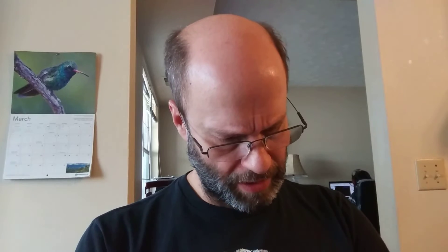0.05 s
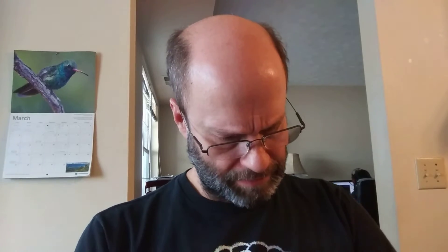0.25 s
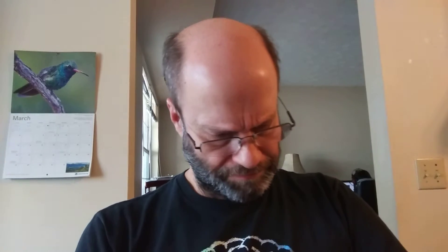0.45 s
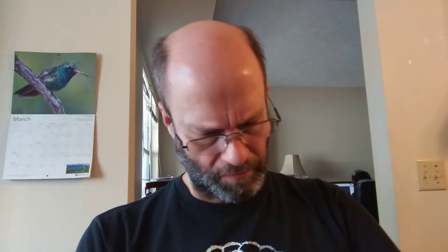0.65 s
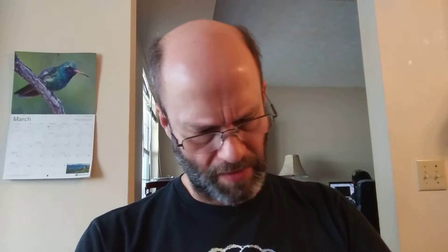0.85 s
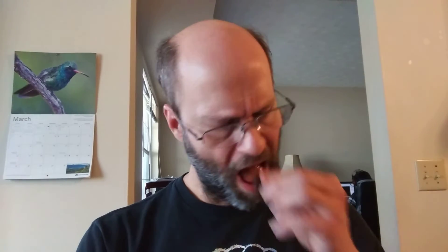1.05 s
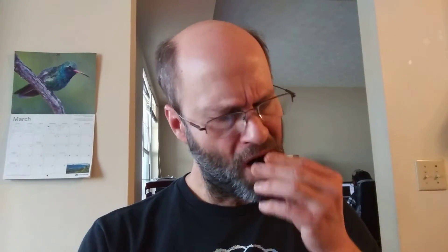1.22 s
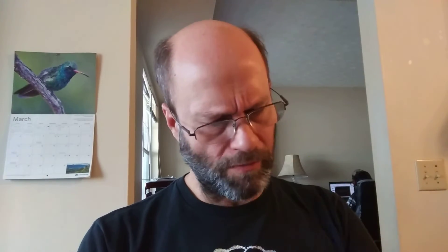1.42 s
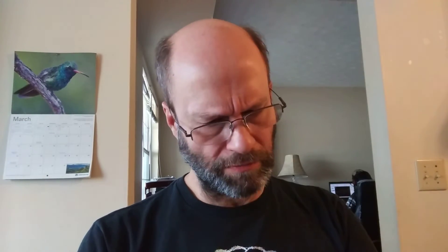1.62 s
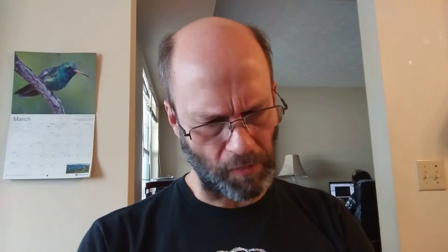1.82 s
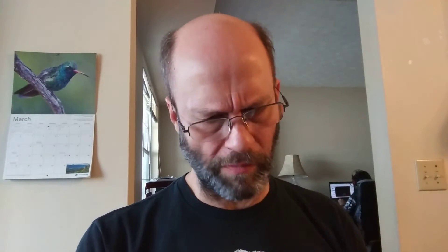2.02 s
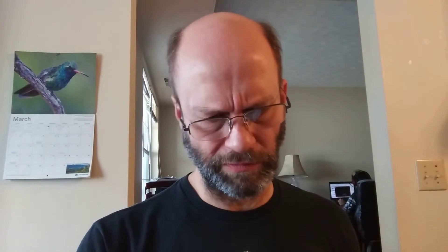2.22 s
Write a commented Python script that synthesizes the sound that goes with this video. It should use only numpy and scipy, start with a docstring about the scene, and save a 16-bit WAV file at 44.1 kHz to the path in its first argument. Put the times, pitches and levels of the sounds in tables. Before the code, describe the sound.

A chocolate bar breaks with one sharp snap close to the microphone. Faint clicks, soft bumps and brief rustles follow as it is handled in a small, quiet room.

```python
"""A bar of dark chocolate snaps close by in a small, quiet room.
Brittle fracture releases a noise burst and sets the bar briefly ringing in its damped modes.
The walls return early reflections, then reverberation and the room's modes die away.
Faint ticks, soft bumps and short rustles of handling surround the snap,
over room tone, a faint hiss and a thin electrical whine."""
import sys
import numpy as np
from scipy import signal
from scipy.fft import rfft, irfft, next_fast_len
from scipy.io import wavfile
from scipy.ndimage import uniform_filter1d

SR = 44100
rng = np.random.default_rng(int(sys.argv[2]) if len(sys.argv) > 2 else 0)


def unload_wav(signal):
    """Save mono or channel-first audio to the path in sys.argv[1] as 16-bit WAV at rate SR, clipped to [-1, 1]."""
    wavfile.write(
        sys.argv[1],
        SR,
        np.round(np.clip(np.atleast_2d(signal).T, -1, 1) * 32767).astype(np.int16),
    )


N = 100107

# the fracture starts, then runs through the bar: start_s, level_db, t60_s
FRACTURES = [(0.4053, -10.5, .004), (.4061, -8.5, 0.02)]
# spectrum of the fracture: frequency_hz, relative_density_db
FRACTURE_SPECTRUM = [(30, -21.5), (120, -18), (300, -3.5), (1100, 2.5), (2200, -6.5), (3200, 0),
                     (4500, -5.5), (5400, -12), (6500, -8), (8200, -4.5), (13000, -6), (16000, -18.5)]
# modes of the broken bar: pitch_hz, level_db, t60_s
BAR_MODES = [(401.3, -19.5, 0.037), (1092, -16, 0.013), (2182, -13.5, .018), (3950, -9.5, .014),
             (4542, -4.5, 0.01), (6466, -16, 0.024)]
# early reflections of the crack: delay_s, gain_db
WALL_REFLECTIONS = [(.0087, -7.5), (.0112, -6.5), (.0128, -5.5), (.0142, -8.5), (.0222, -13), (.0335, -10)]
# the snap as it fills the room: frequency_hz, relative_density_db
REVERB_SPECTRUM = [(24, -79.5), (40, -49.5), (176, -30.5), (209, -10.5), (237, 0.5), (283, -7.5), (320, 0),
                   (363, -11), (455, -7), (697, -4), (770, -6.5), (990, -2), (1150, -9), (1850, -4),
                   (2500, -13.5), (4340, -1), (5720, -9), (6820, -2.5), (7930, -10.5), (13100, -13.5),
                   (16000, -20.5)]
# reverberation time of the room: frequency_hz, t60_s
REVERB_TIMES = [(60, 0.27), (250, .24), (1000, .28), (4000, 0.28), (8000, 0.25), (15000, 0.26)]
# the room's strongest modes: pitch_hz, level_db
STANDING_WAVES = [(226, -28.5), (256, -33), (327, -28.5), (964, -32), (1416, -33), (1792, -31.5),
                  (1966, -33.5), (2573, -35), (3693, -31), (3930, -31), (4516, -26.5), (4637, -31),
                  (4758, -28.5), (4958, -32), (6185, -35.5), (6934, -31.5)]
# small dry clicks: start_s, level_db, pitch_hz, relative_noise_db, relative_treble_db, rise_s, t60_s
TICK_EVENTS = [(.052, -50.5, 2420, 2, -14.5, 0.0011, 0.011), (.070, -48.5, 3340, -5.5, -10, 0.00075, 0.011),
               (0.079, -54.5, 8500, -9, 1.5, 0.0016, .02), (0.102, -39, 1943, -11.5, -20, 0.0031, 0.013),
               (.2348, -37, 3900, 2, -11, .0004, 0.01), (.584, -46, 1450, 4.5, -15, 0.00063, 0.021),
               (.662, -55, 4600, -4.5, -0.5, 0.00057, 0.016), (.892, -56, 2140, -2, -13.5, 0.00068, 0.022),
               (.933, -56, 11000, -13, 0, .0015, 0.018), (.992, -46.5, 2000, -0.5, -6.5, 0.0017, 0.02),
               (1.007, -44, 2137, 0.5, -4.5, 0.0032, 0.016),
               (1.0169, -41.5, 2100, -7.5, -1.5, 0.00073, 0.013),
               (1.076, -54.5, 8440, -6, -3.5, .001, 0.017), (1.079, -46, 3725, -15.5, -15.5, 0.0012, 0.014),
               (1.180, -63, 5400, -6, 3, .001, .015), (1.322, -58, 6540, -7.5, -5, 0.00096, .012),
               (1.378, -58, 9170, -9.5, -4, .001, .012), (1.419, -53, 2105, 0.5, -18, 0.00096, 0.011),
               (1.478, -52, 2905, 0, -24.5, 0.00089, 0.031), (1.546, -42.5, 2080, 2, -19, 0.00061, 0.03),
               (1.555, -54, 3110, -0.5, -18, 0.0044, 0.047), (1.6781, -36, 2290, 2, 6, 0.00056, 0.00797),
               (1.686, -41, 9900, 1, -3.5, 0.00053, .008), (1.6883, -39.5, 2770, 4, 1, 0.00041, .018),
               (1.768, -46.5, 2550, -14, -9.5, .001, 0.034), (1.894, -43.5, 10140, -4, -2, 0.0012, 0.018),
               (1.899, -41, 3760, -8, -7, 0.0015, 0.017), (1.900, -41, 2558, -7, -10, 0.0026, .022)]
# noise in the body of a click: frequency_hz, relative_density_db
TICK_BODY_SPECTRUM = [(60, -30), (250, -14), (1000, -4.5), (2500, 6), (4300, 0.5), (5500, -11.5),
                      (9000, -14.5), (16000, -27.5)]
# noise in its treble: frequency_hz, relative_density_db
TICK_TREBLE_SPECTRUM = [(2000, -26), (5500, -3), (9500, -2.5), (12000, -7), (16000, -6)]
# soft, dull contacts: start_s, level_db, pitch_hz, t60_s
BUMP_EVENTS = [(0.175, -50, 399, 0.016), (.573, -44.5, 168, 0.036), (.578, -41.5, 405, 0.032),
               (.823, -40, 303, 0.042), (1.478, -39.5, 340, 0.023), (1.547, -38.5, 293.5, 0.034),
               (1.686, -40, 370, 0.031), (1.689, -41.5, 900, 0.022), (1.765, -50, 313, 0.077)]
# brushes of fingers and wrapper: peak_s, level_db, rise_s, fall_s, treble_tilt_db_per_octave
BRUSHES = [(.142, -54, 0.067, 0.053, 0), (.402, -53.5, 0.0451, 0.01, -0.5), (0.808, -43, 0.051, 0.032, -1),
           (1.621, -49.5, 0.0038, 0.022, -2), (1.634, -54.5, 0.013, 0.0074, 0.5),
           (1.659, -52.5, .003, .03, 1), (1.676, -44, 0.021, 0.042, 0), (1.769, -55, 0.041, 0.046, -4),
           (1.899, -53.5, 0.016, 0.0098, -4.5), (2.262, -63, 0.047, .04, -8)]
# friction noise of a brush: frequency_hz, relative_density_db
FRICTION_SPECTRUM = [(120, -44.5), (200, -16.5), (448, -9.5), (836, -13), (2960, -10.5), (4200, -6.5),
                     (4520, -5), (5940, -15), (10300, -13.5), (11700, -16.5), (16000, -15.5)]
# room tone: frequency_hz, relative_density_db
ROOM_TONE_SPECTRUM = [(15, -75.5), (25, -43), (141, -35), (170, -12.5), (270, -4), (317, -1), (427, -8),
                      (531, -6), (887, -13), (1070, -8.5), (1480, -18.5), (3250, -23), (7920, -35.5),
                      (9320, -28), (16000, -29)]
# slow drift of the hiss: time_s, relative_level_db
HISS_LEVELS = [(0.0, -59), (0.26, -72), (0.6, -67), (1.23, -68), (1.43, -72), (1.71, -65), (1.94, -71.5),
               (2.26, -74.5)]
# spectrum of the hiss: frequency_hz, relative_density_db
HISS_SPECTRUM = [(300, -11.5), (1500, 4), (4200, -1.5), (6000, -8), (16000, -15.5)]

ROOM_DELAY_S, ROOM_BUILD_S = 0.008, 0.0048


def snap():
    """Brittle fracture radiates noise and excites the bar's modes; the direct sound carries little deep bass."""
    start, split = FRACTURES[0][0], FRACTURES[-1][0]
    crack = sum(amp(db) * envelope(s, t60, rise_s=0.00016) * noise(FRACTURE_SPECTRUM)
                for s, db, t60 in FRACTURES)
    ring = sum(amp(db) * envelope(split, t60, rise_s=0.00051) * tone(split, hz)
               for hz, db, t60 in BAR_MODES)
    direct = crack + ring
    return low_cut(direct, hz=90, order=1) + wall_echoes(direct) + snap_reverberation(start)


def wall_echoes(direct):
    """Reflection: each wall path returns a delayed, weaker copy with little bass."""
    def response(hz):
        return sum(amp(db) * np.exp(-2j * np.pi * hz * delay) for delay, db in WALL_REFLECTIONS)
    return filtered(low_cut(direct, hz=259.4, order=2), response)


def snap_reverberation(start_s, diffuse_db=-15.5):
    """A diffuse field and standing waves decay at the room's reverberation time for each frequency."""
    diffuse = room_decay(noise(REVERB_SPECTRUM), start_s + ROOM_DELAY_S, hold_s=0.015)
    modes = sum(amp(db) * envelope(start_s, curve_at(REVERB_TIMES, hz), rise_s=0.008) * tone(start_s, hz)
                for hz, db in STANDING_WAVES)
    return amp(diffuse_db) * diffuse + modes


def ticks():
    """Impulsive excitation: one damped resonance and two bands of noise share each click's envelope."""
    body, treble = noise(TICK_BODY_SPECTRUM), noise(TICK_TREBLE_SPECTRUM)
    out = np.zeros(N)
    for start, db, hz, noise_db, treble_db, rise, t60 in TICK_EVENTS:
        click = tone(start, hz) + amp(noise_db) * body + amp(treble_db) * treble
        out += amp(db) * envelope(start, t60, rise) * click
    return out


def bumps():
    """Damped oscillation: each soft contact gives a brief low note."""
    return sum(amp(db) * envelope(s, t60, rise_s=0.0034) * tone(s, hz) for s, db, hz, t60 in BUMP_EVENTS)


def rustles(grain_db=3):
    """Sliding friction makes grainy noise; each rise or fall time spans a tenfold amplitude change."""
    out = np.zeros(N)
    for peak, db, rise, fall, tilt_db in BRUSHES:
        t = since(peak)
        swell = 10 ** -np.maximum(-t / rise, t / fall)
        flicker = unit_rms(uniform_filter1d(rng.standard_normal(N), size=40))
        friction = amp(grain_db * flicker) * noise(FRICTION_SPECTRUM, tilt_db)
        out += amp(db) * swell * unit_rms(friction)
    return out


def handling_reverberation(x, gain_db=-12):
    """Convolution with the room's impulse response gives each small sound a diffuse tail."""
    impulse_response = room_decay(rng.standard_normal(N), ROOM_DELAY_S, hold_s=0)[:SR // 2]
    impulse_response /= np.linalg.norm(impulse_response)
    return amp(gain_db) * signal.fftconvolve(x, impulse_response)[:N]


def room_decay(x, start_s, hold_s):
    """Absorption: the field builds up and, after hold_s, each frequency decays at its own rate."""
    hz, t, spectra = signal.stft(x, SR, nperseg=256)
    decay_s = np.maximum(t - start_s - hold_s, 0)
    decay = np.exp(-np.log(1000) * decay_s / curve_at(REVERB_TIMES, hz)[:, None])
    build_up = np.clip(since(start_s) / ROOM_BUILD_S, 0, 1)
    return signal.istft(spectra * decay, SR, nperseg=256)[1][:N] * build_up


def background(room_tone_db=-63, hiss_gain_db=-1.5, whine_db=-80, whine_hz=9591.5):
    """The noise floor is the sum of steady room tone, a drifting hiss and a thin electrical whine."""
    room_tone = amp(room_tone_db) * noise(ROOM_TONE_SPECTRUM)
    drift_db = np.interp(since(0), *np.transpose(HISS_LEVELS))
    hiss = amp(hiss_gain_db + drift_db) * noise(HISS_SPECTRUM)
    whine = amp(whine_db) * np.sqrt(2) * tone(0, whine_hz)
    return room_tone + hiss + whine


def amp(db):
    """Decibels as an amplitude ratio."""
    return 10 ** (np.asarray(db) / 20)


def unit_rms(x):
    """Normalisation to an rms of 1."""
    return x / np.sqrt(np.mean(x ** 2) + 1e-20)


def curve_at(points, hz):
    """Interpolation on a logarithmic frequency axis."""
    frequencies, values = np.transpose(points)
    return np.interp(np.log(hz + 1), np.log(frequencies + 1), values)


def since(start_s):
    """Elapsed seconds at every sample."""
    return np.arange(N) / SR - start_s


def envelope(start_s, t60_s, rise_s):
    """A quadratic rise, then exponential damping by 60 dB in t60_s."""
    t = np.maximum(since(start_s), 0)
    attack = np.minimum(t / rise_s, 1) ** 2
    return attack * np.exp(-np.log(1000) * np.maximum(t - rise_s, 0) / t60_s)


def tone(start_s, hz):
    """Simple harmonic motion with zero phase at start_s."""
    return np.sin(2 * np.pi * hz * since(start_s))


def noise(spectrum, tilt_db=0):
    """Spectrally shaped noise of rms 1, its treble tilted by tilt_db per octave."""
    def response(hz):
        return amp(curve_at(spectrum, hz) + tilt_db * np.log2(1 + hz / 1000))
    return unit_rms(filtered(rng.standard_normal(N), response))


def filtered(x, response):
    """Linear filtering multiplies the spectrum by a frequency response."""
    size = next_fast_len(N + SR // 2)
    hz = np.fft.rfftfreq(size, 1 / SR)
    return irfft(rfft(x, size) * response(hz), size)[:N]


def low_cut(x, hz, order):
    """A high-pass filter attenuates the bass."""
    return signal.sosfilt(signal.butter(order, hz, "highpass", fs=SR, output="sos"), x)


def scene():
    """Superposition of the snap, the handling sounds and the background in one room."""
    handling = low_cut(ticks() + bumps() + rustles(), hz=167, order=3)  # small things radiate little bass
    return (snap() + handling + handling_reverberation(handling) + background())[None]


def record(dry, ceiling=0.7, band_limit_hz=15800):
    """Soft saturation rounds the highest peaks; a low-pass filter limits the bandwidth."""
    rounded = dry[0] / (1 + (dry[0] / ceiling) ** 6) ** (1 / 6)
    return filtered(rounded, lambda hz: hz < band_limit_hz)[None]


dry = scene()
out = record(dry)
unload_wav(out)
```